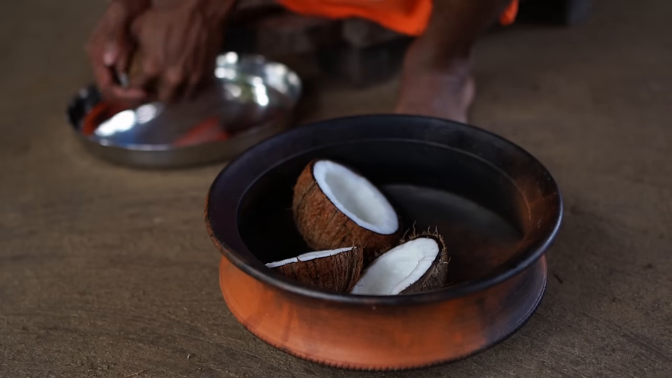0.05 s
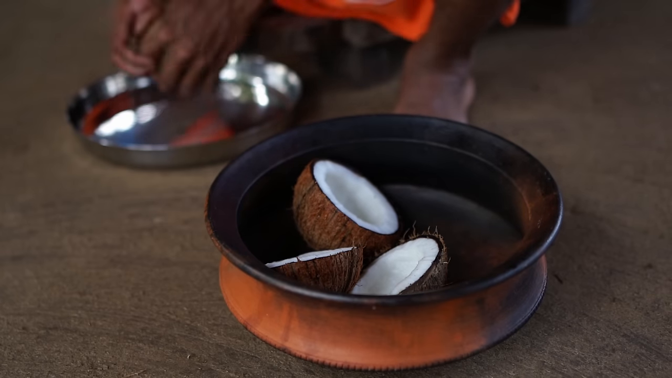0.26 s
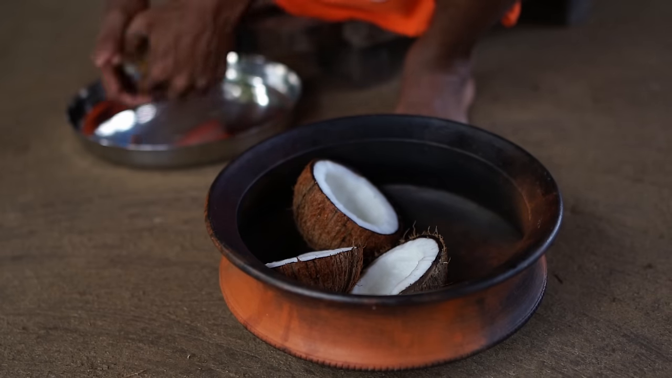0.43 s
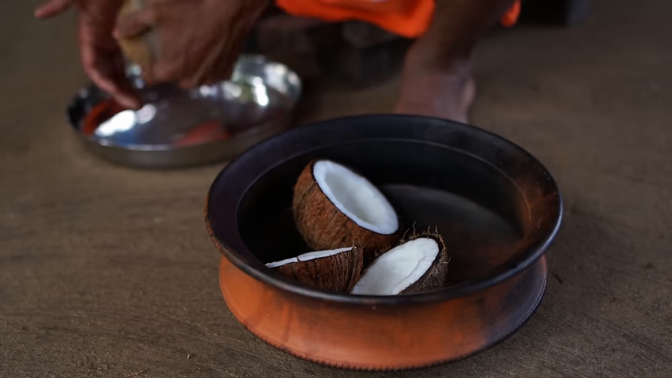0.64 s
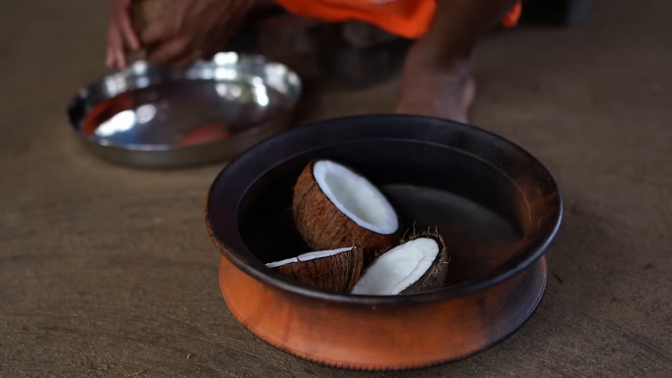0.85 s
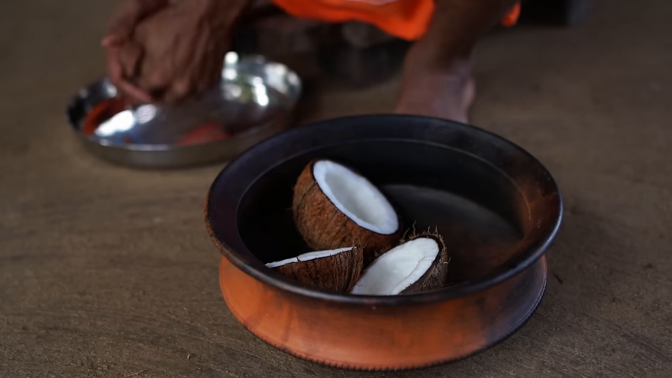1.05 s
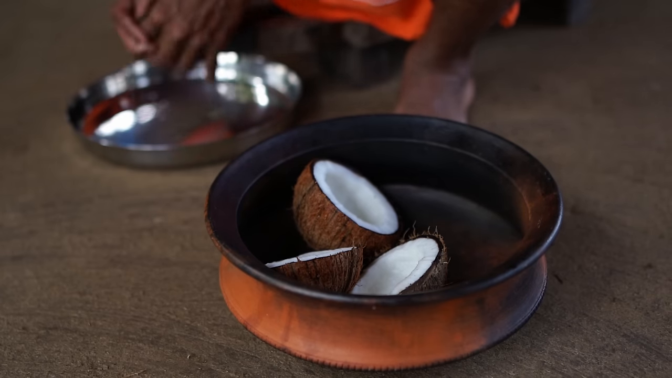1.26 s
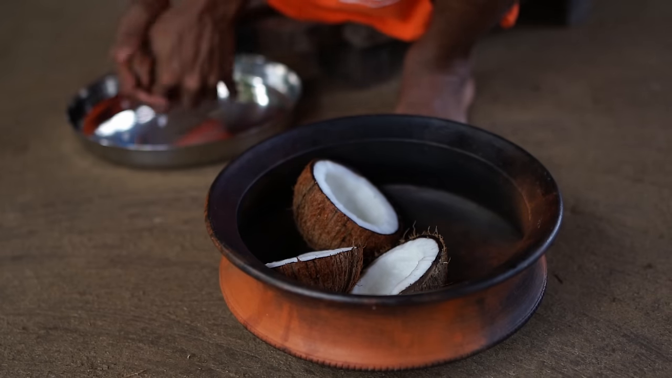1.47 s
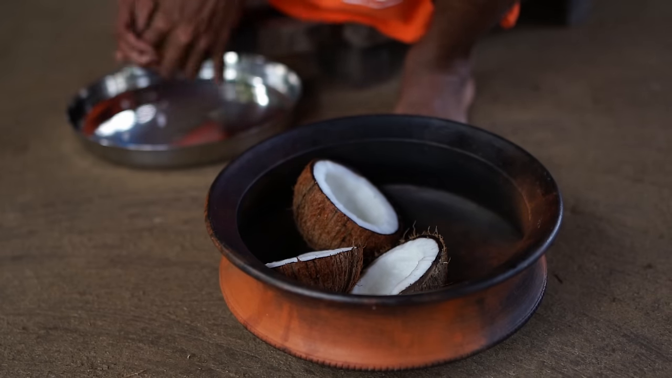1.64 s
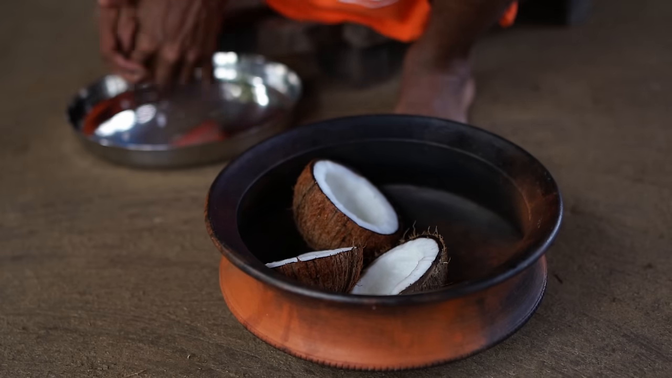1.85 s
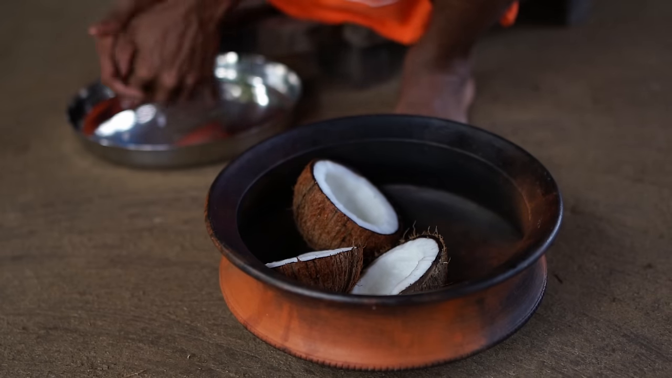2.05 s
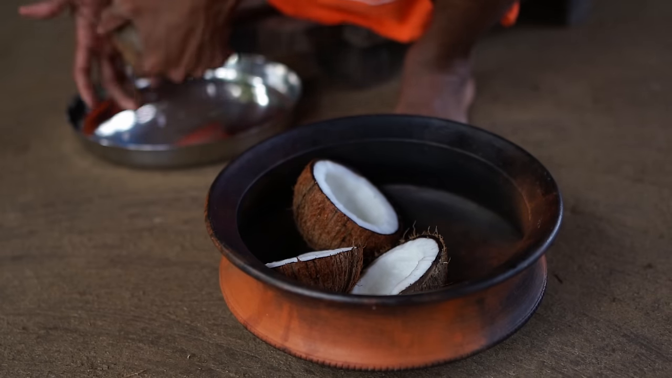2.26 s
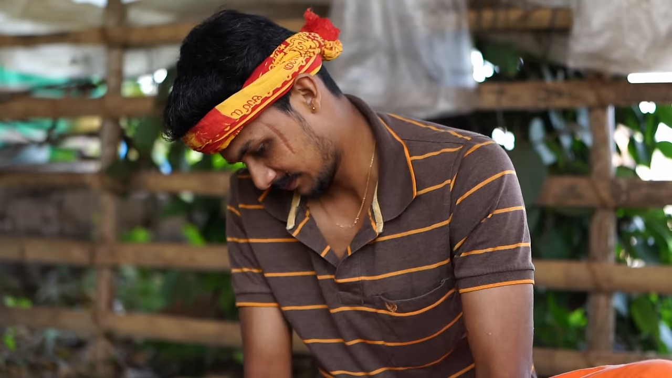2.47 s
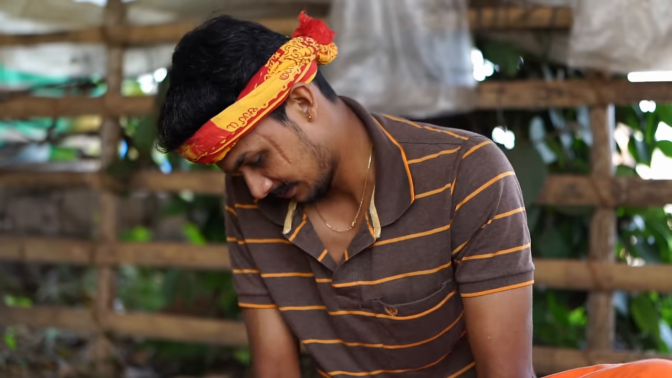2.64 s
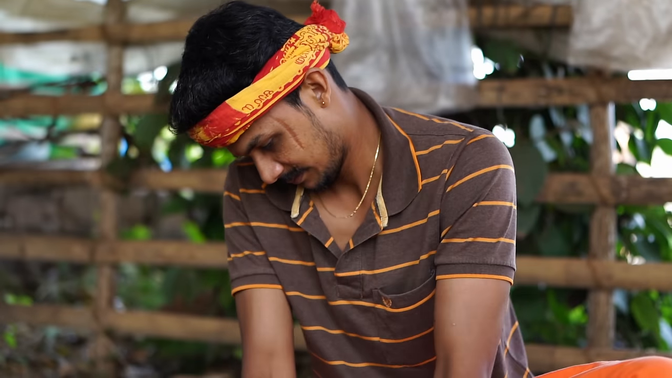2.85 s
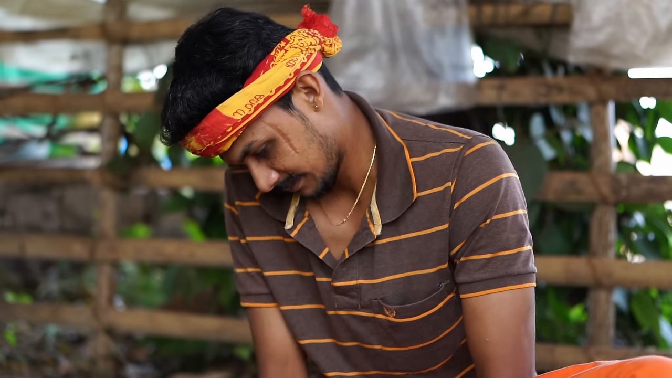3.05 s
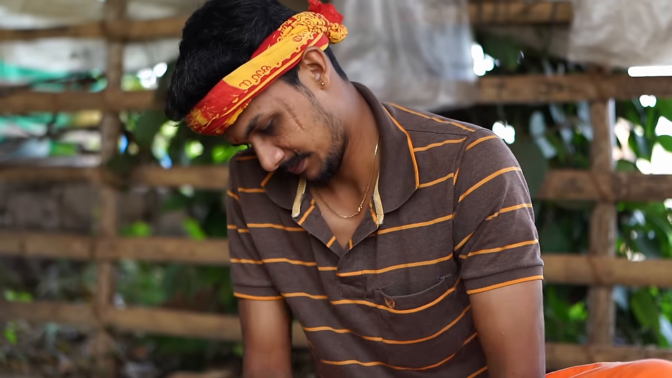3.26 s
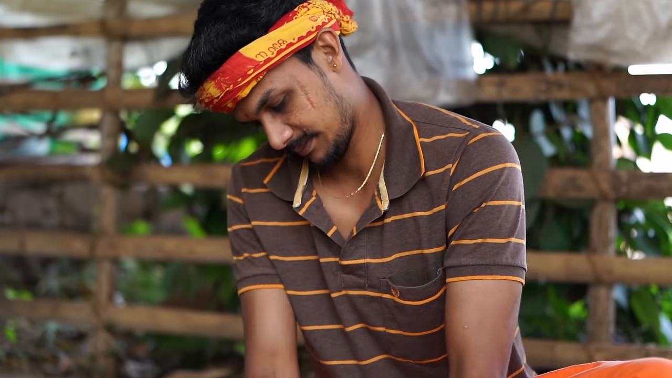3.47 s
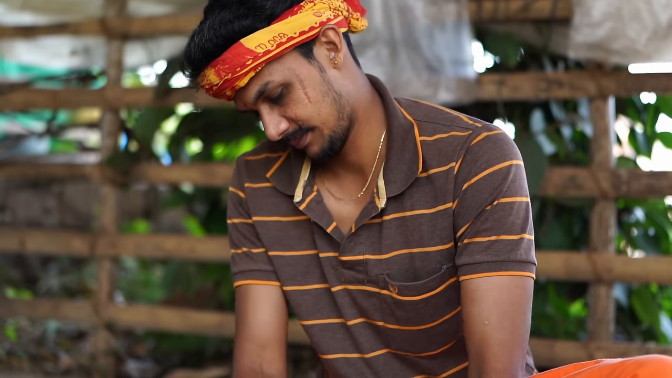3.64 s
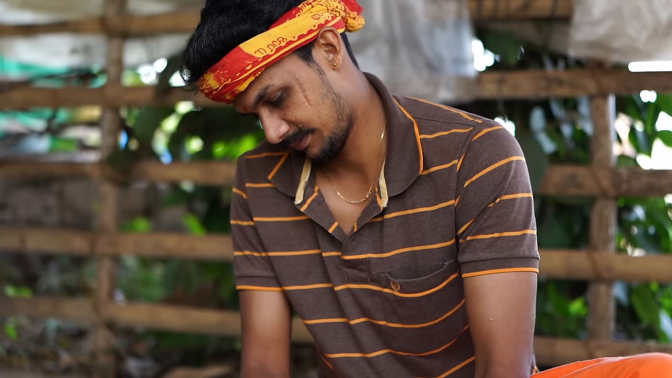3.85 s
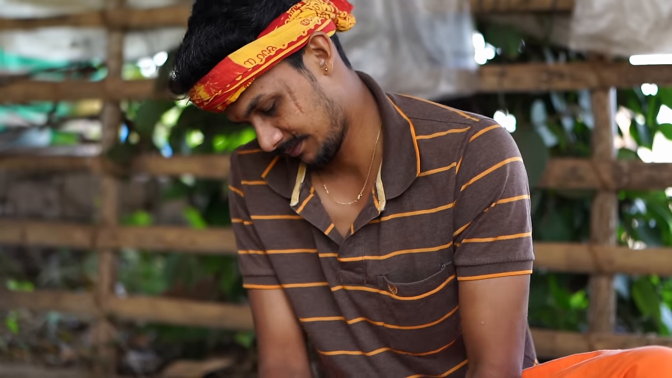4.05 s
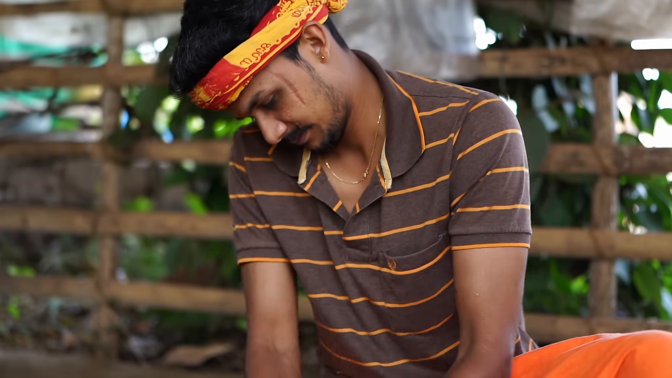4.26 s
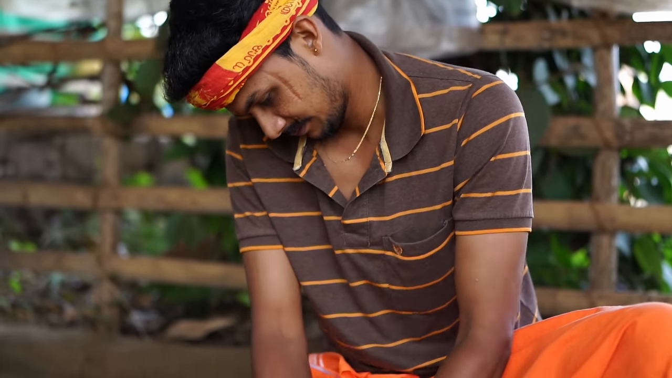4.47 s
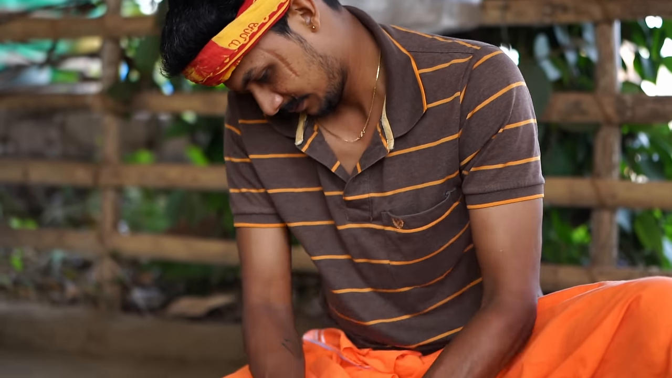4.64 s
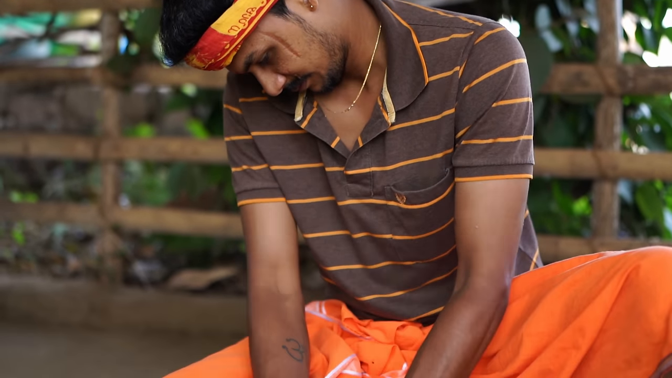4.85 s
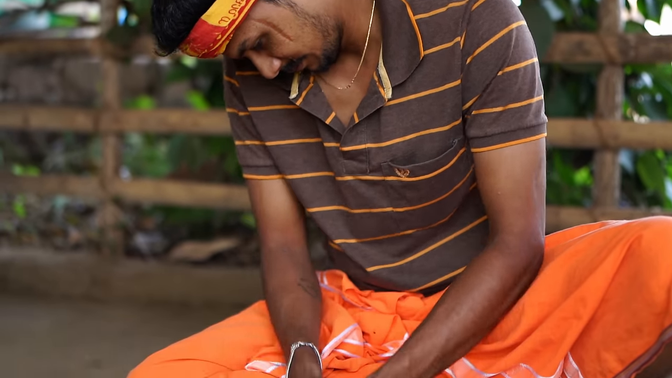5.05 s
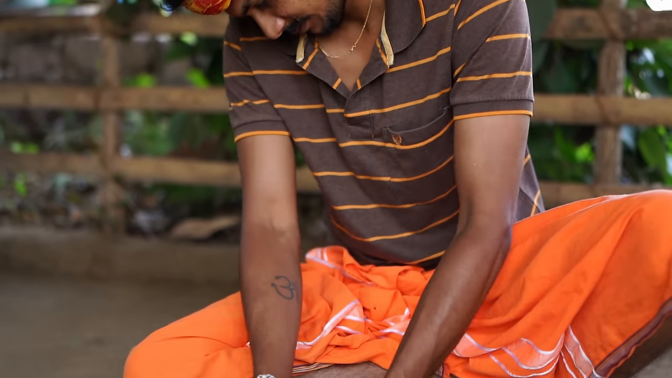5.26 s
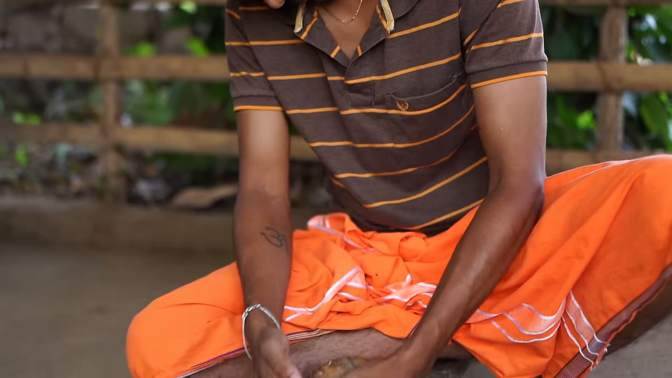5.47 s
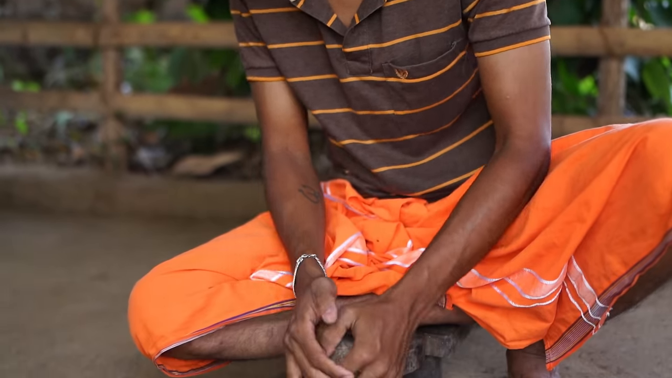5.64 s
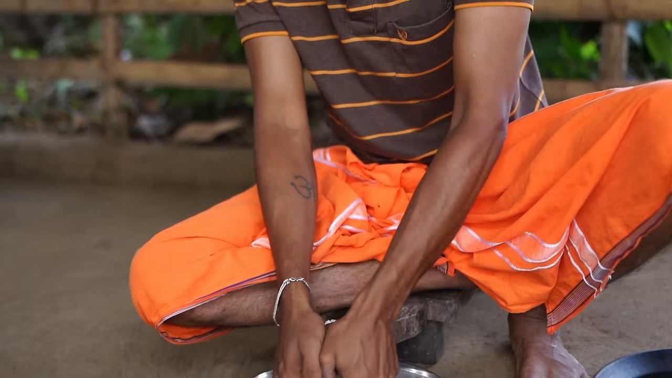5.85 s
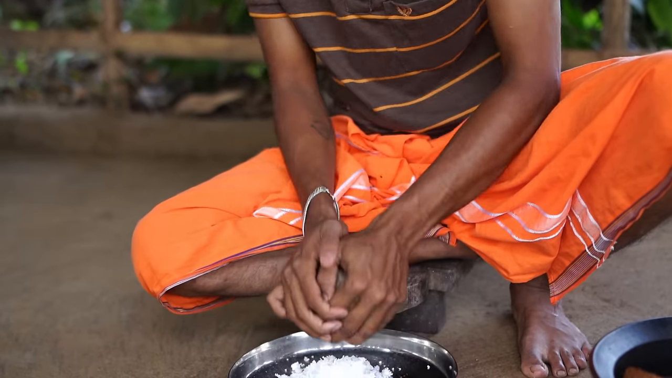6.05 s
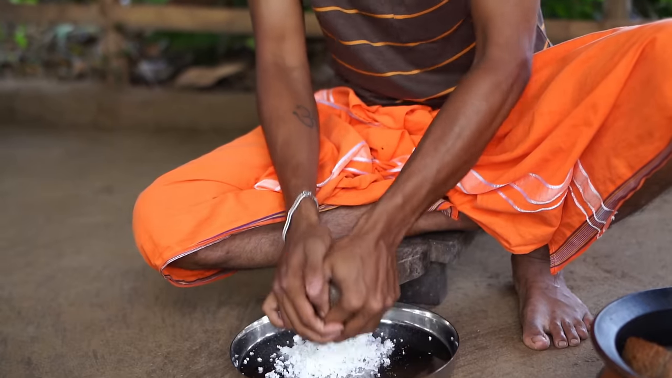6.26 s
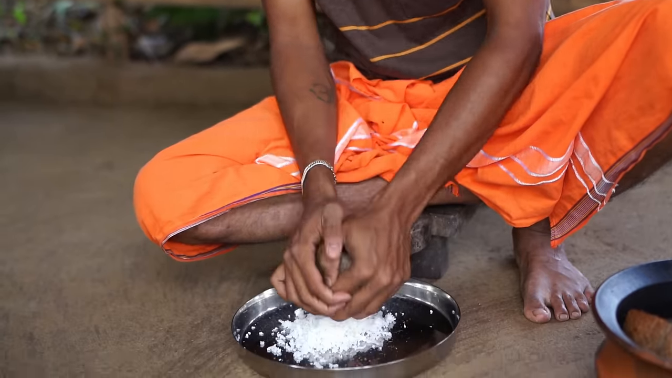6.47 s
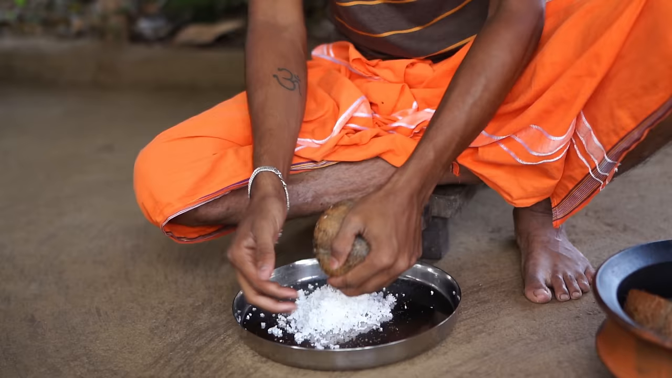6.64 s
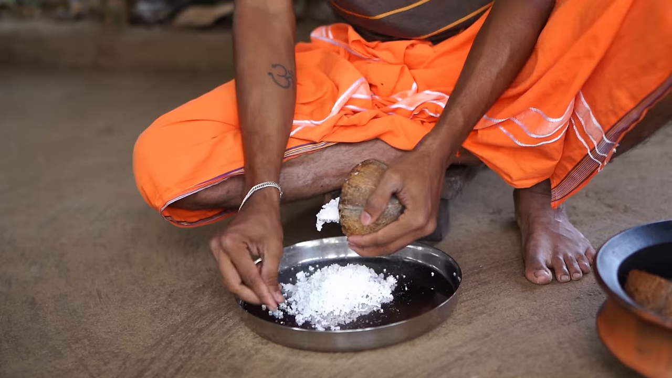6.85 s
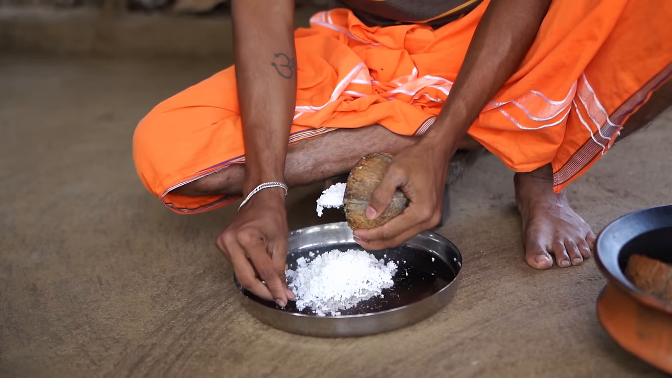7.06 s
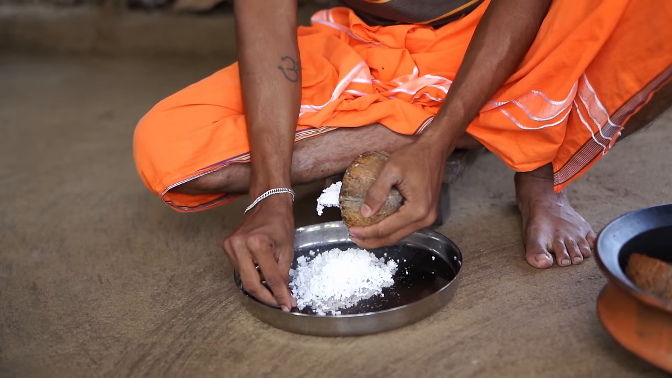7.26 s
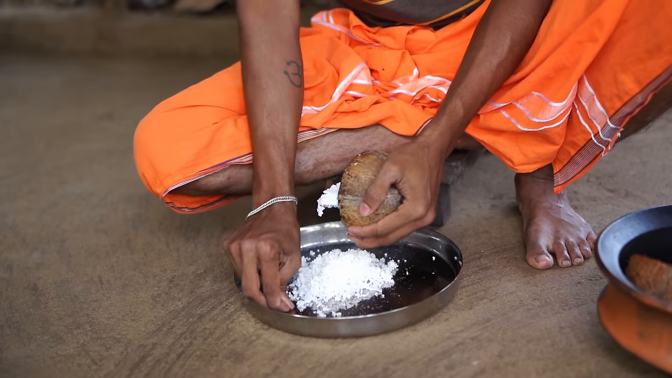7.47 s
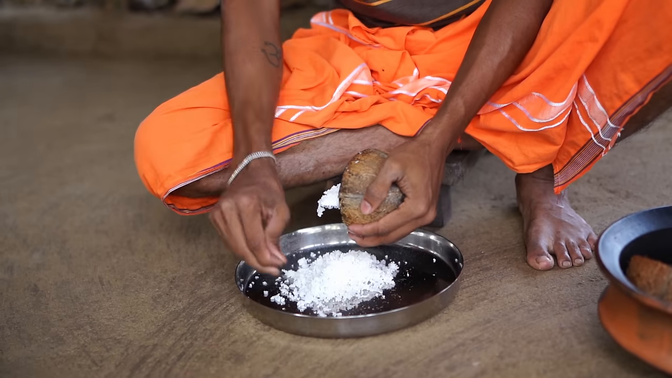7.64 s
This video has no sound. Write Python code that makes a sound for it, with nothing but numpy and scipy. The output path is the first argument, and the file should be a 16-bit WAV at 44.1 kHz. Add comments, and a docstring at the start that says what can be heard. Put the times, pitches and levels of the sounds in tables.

```python
"""Half a coconut is scraped on a serrated steel grater under an open shelter, in uneven bursts of strokes.
From the start the shell knocks on the blade and the teeth stick and slip, ring the shell and tear its fibres.
Between strokes the husk rustles and crumbs tick; at 2.4 s the shell is turned and its resonances change.
Gliding whistles of small birds call early and, faintly, after the last stroke, when soft bumps also sound.
Filtered noise makes the garden air and the draught that grows from about 2.3 s; sines make a faint hum."""
import sys
import numpy as np
from scipy import signal
from scipy.fft import rfft, irfft
from scipy.io import wavfile
from scipy.ndimage import map_coordinates

SR = 44100
rng = np.random.default_rng(int(sys.argv[2]) if len(sys.argv) > 2 else 0)


def int16_out(signal):
    """Quantize to a 16-bit WAV file."""
    q = np.round(np.clip(np.atleast_2d(signal).T, -1, 1) * 32767)
    wavfile.write(sys.argv[1], SR, q.astype(np.int16))


N = 340011
TIME = np.arange(N) / SR
HAND_TIME = TIME[::32]  # coarse time grid for hand movements
FREQS = np.fft.rfftfreq(8192, 1 / SR)
TURN_S = 2.4  # the shell is raised and turned

# shell meets blade, or a tooth catches and lets go:
# start_s, relative_peak_db, crack_re_knock_db (before the mix gains)
KNOCK_EVENTS = [(0.203, -37, 16.5), (0.32, -2, -13), (0.35, -3.5, -16), (0.609, -31, 6),
                (1.005, -2.5, -0.5), (1.036, 0, 2), (1.055, -2.5, 4.5), (1.112, -5, -14),
                (1.277, -41.5, 21.5), (1.316, -19.5, 2), (1.731, -21, -13), (1.763, 2.5, -8.5),
                (1.775, -4, -19), (1.968, -22, -11), (2.59, -33, 6.5), (2.984, -38.5, 17),
                (3.065, -4.5, -6), (3.317, -10, -8), (3.381, 0, -32), (3.875, -23.5, 1), (4.109, -2, -26),
                (4.365, -20, 3.5), (4.721, -25.5, -4), (5.07, -27.5, 11), (5.105, 1.5, -13),
                (5.771, 0, -12), (6.047, -26.5, 10.5), (6.114, 2, -15), (6.12, -2, 4.5),
                (6.383, -19.5, 5.5)]


def amp(db):
    """Decibels to amplitude gain."""
    return 10 ** (np.asarray(db) / 20)


def unit(x):
    """Scales to rms 1."""
    return x / np.sqrt(np.mean(x ** 2) + 1e-20)


def read(points, hz):
    """Interpolates a (hz, db) spectrum on a log-frequency axis."""
    f, db = np.transpose(points)
    return np.interp(np.log(hz + 1), np.log(f + 1), db)


def add(mix, start_s, sound):
    """Mixes a sound in at its start time, in place."""
    part = mix[max(round(start_s * SR), 0):][:len(sound)]
    part += sound[:len(part)]


def follow(curve):
    """Gain over time from a curve of (time_s, level_db)."""
    return amp(np.interp(TIME, *np.transpose(curve)))


def response(db):
    """Minimum-phase impulse response of energy 1 with the given dB spectrum."""
    log_gain = np.log(amp(np.maximum(db, -100)))
    circle = np.r_[log_gain, log_gain[-2:0:-1]]
    spectrum = np.exp(np.conj(signal.hilbert(circle)))[:len(db)]
    taps = irfft(spectrum)[:len(db)]
    return taps / np.linalg.norm(taps)


def ring(x, taps):
    """Plays x through an impulse response."""
    return signal.oaconvolve(x, taps)[:len(x)]


def noise(points):
    """Steady noise of rms 1 with the given spectrum."""
    gain = amp(read(points, np.fft.rfftfreq(N, 1 / SR)))
    return unit(irfft(rfft(rng.standard_normal(N)) * gain, N))


def wander(window_s):
    """Smooth random curve of rms 1."""
    return unit(ring(rng.standard_normal(N), signal.windows.hann(int(window_s * SR) + 3)))


def steadied(x, window_s):
    """Keeps local power near 1: the hand presses evenly."""
    window = signal.windows.hann(int(window_s * SR) + 3)
    power = abs(signal.oaconvolve(x ** 2, window / window.sum(), "same"))
    return x / np.sqrt(power + 1e-4)


def crackle(per_s, spread_db):
    """Random clicks of either sign and uneven size."""
    clicks = (rng.random(N) < per_s / SR) * rng.choice([-1., 1.], N)
    return clicks * amp(spread_db * np.clip(rng.standard_normal(N), -2, 2))


def scrape(bite_db=-2, rasp_db=-5.0, tear_db=2.0, fizz_db=-11, push_db=0):
    """Each slip jolts the shell and the board and snaps a clump of fibres: coarse, fine and finest."""
    # force spectra: hz, db
    bite_tilt = [(200, -3.5), (330, -3.5), (480, -4.5), (800, 0), (1400, -4), (2200, -5.5),
                 (3500, -5.5), (6000, -15), (15000, -56)]
    rasp_tilt = [(400, -11.5), (1000, -17.0), (1400, -5.5), (2400, 0.0), (4000, -14.0), (9000, -26)]
    tear_tilt = [(300, -17), (1200, -10.0), (2200, -9), (3500, -4), (5500, -3.5), (15000, 0)]
    fizz_tilt = [(1000, -75), (4000, -3.5), (7000, -4.0), (15000, -10)]
    slips = slip_train()
    force, tearing, weight = pressure()
    bite = shell(slips * force * catching(), bite_tilt)
    # the heavy board answers evenly, however the slips fall
    push = steadied(board(slips), 0.057) * weight
    rasp = shell(fibres(slips) * tearing, rasp_tilt)
    tear = shell(fibres(slips) * tearing, tear_tilt)
    fizz = shell(fibres(slips) * tearing, fizz_tilt)
    mix = amp(bite_db) * bite + amp(push_db) * push
    mix += amp(rasp_db) * rasp + amp(tear_db) * tear + amp(fizz_db) * fizz
    return turning(mix)


def slip_train(slips_per_s=700, spread_db=5, jitter=.75, recoil=.4):
    """Teeth stick and slip at uneven gaps; most jolts go with the stroke, some spring back."""
    gaps_s = np.exp(jitter * rng.standard_normal(N // 30)) / slips_per_s  # slips_per_s: 1 / median gap
    at = (np.cumsum(gaps_s) * SR).astype(int)
    slips = np.zeros(N)
    slips[at[at < N]] = 1
    sign = np.where(rng.random(N) < recoil, -1, 1)
    slips *= sign * amp(spread_db * np.clip(rng.standard_normal(N), -2, 2))
    return steadied(unit(slips), 0.02)


def swell(s, attack_s, hold_s, release_s, swell_db=30, shoulder=1.66):
    """Level in dB of one hand movement: builds up to time s, holds, lets go along a rounded shoulder."""
    before = np.maximum((s - HAND_TIME) / attack_s, 0)
    after = np.maximum((HAND_TIME - s - hold_s) / release_s, 0)
    return -swell_db * np.minimum(before + after, 4) ** shoulder


def pressure(tear_attack_ratio=1.38, tear_release_ratio=1.226,
             push_lead_s=.004, push_sag_db_per_s=115, push_release_ratio=1.9):
    """Gains of bite, tearing and push: one movement drives all three."""
    # strokes, relative levels before the mix gains:
    # full_pressure_s, attack_s, hold_s, release_s, bite_db, tear_db, push_db
    stroke_table = [(-.01, .05, 0.017, 0.069, -17, -26, -27.5),
                    (0.294, .074, 0.015, .104, -11, -25.5, -17.5),
                    (0.955, 0.049, 0.0027, 0.06, -19, -31, -28.5),
                    (1.013, 0.035, 0.035, 0.12, -14, -29.5, -22.5),
                    (1.348, 0.038, 0.044, 0.097, -11.5, -27, -19.5),
                    (1.519, 0.028, .003, 0.053, -29.5, -48, -41),
                    (1.685, 0.052, 0.045, 0.11, -12.5, -26, -23.5),
                    (2.012, 0.049, 0.044, 0.088, -11.5, -25, -23),
                    (2.706, 0.04, 0.079, .102, -15, -28, -28),
                    (3.089, 0.079, 0.023, .108, -11.5, -25.5, -28),
                    (3.385, 0.052, 0.047, 0.11, -13, -27.5, -28),
                    (3.905, 0.017, 0.0098, 0.12, -37.5, -51, -43),
                    (4.09, 0.037, 0.087, 0.071, -11, -30, -35),
                    (4.463, 0.072, 0.045, 0.082, -13.5, -27, -30.5),
                    (4.788, 0.057, 0.045, 0.09, -14, -26, -25.5),
                    (5.113, 0.035, 0.05, 0.11, -14, -26.5, -23.5),
                    (5.757, .034, 0.071, 0.089, -16.5, -27, -38.5),
                    (6.098, 0.031, 0.055, 0.1, -14.5, -26.5, -24.5),
                    (6.441, 0.034, 0.065, 0.088, -16, -27.5, -26.5)]
    bite, tearing, push = np.zeros((3, len(HAND_TIME)))
    for s, attack_s, hold_s, release_s, bite_db, tear_db, push_db in stroke_table:
        bite += amp(bite_db + swell(s, attack_s, hold_s, release_s))
        # tearing starts before the bite and outlasts it
        tear_swell_db = swell(s, attack_s * tear_attack_ratio, hold_s, release_s * tear_release_ratio)
        tearing += amp(tear_db + tear_swell_db)
        # the board takes the weight as the stroke lands, then is eased
        sag_db = push_sag_db_per_s * np.maximum(HAND_TIME - s, 0)
        push_swell_db = swell(s - push_lead_s, attack_s, hold_s, release_s * push_release_ratio)
        push += amp(push_db - sag_db + push_swell_db)
    return [np.interp(TIME, HAND_TIME, gain) for gain in (bite, tearing, push)]


def catching(hold_s=0.005, hold_db=-7):
    """A caught tooth damps the bite until the knock that frees it."""
    stuck, n = np.zeros(N), int(hold_s * SR)
    for s, _, _ in KNOCK_EVENTS:
        add(stuck, s - hold_s + 0.00053, signal.windows.tukey(n, .5))
    return amp(hold_db * np.minimum(stuck, 1))


def fibres(slips, snap_s=0.005, clump=.55, patchy_db=2, grain_db=2):
    """Fine crackle swells around each slip, in small clumps and broader patches as the flesh varies."""
    window = signal.windows.hann(int(snap_s * SR) + 3)
    slip_power = signal.oaconvolve(slips ** 2, window / window.sum(), "same")
    snapping = np.sqrt(abs(1 - clump + clump * slip_power))
    uneven = unit(amp(patchy_db * wander(0.037) + grain_db * wander(0.0031)))
    return steadied(unit(crackle(per_s=10000, spread_db=2)), 0.0063) * snapping * uneven


def shell(drive, tilt):
    """Rings the hollow shell and the blade; tilt is the spectrum of the force."""
    # body spectra, held low over the plate / raised and turned: hz, level_db
    low_colour = [(40, -55), (90, -39), (140, -24.9), (220, -11.8), (400, -5.4), (850, 0.0), (1200, -5.8),
                  (1450, -19.3), (2000, -8.4), (2500, -13.2), (4300, -17.5), (6000, -25.7), (9000, -30.1),
                  (15500, -40.2)]
    turned_colour = [(40, -55), (90, -34), (140, -20.2), (220, -10.8), (400, -10.0), (850, 0.0),
                     (1200, -7.7), (1450, -17.9), (2000, -18.2), (2500, -18.5), (4300, -17.1),
                     (6000, -25.9), (9000, -29.6), (15500, -40.6)]
    # shell resonances in the same positions: centre_hz, width_hz, lift_db
    low_modes = [(257, 69, 12.5), (309, 30, 5.0), (490, 85, 4.3), (788, 30, 4.1), (895, 35, 4.4),
                 (970, 47, 7.4), (1250, 126, 10.0), (1501, 128, 12.5), (2099, 60, 6.1), (2240, 130, 5.0),
                 (2757, 186, 4.1), (3594, 210, 1.9), (4439, 116, 3.3), (5459, 428, 5.4), (13338, 549, 7.8)]
    turned_modes = [(242, 67, 5.0), (371, 76, 10.4), (479, 83, 8.8), (634, 30, 4.2), (710, 85, 4.4),
                    (776, 68, 1.6), (957, 30, 3.9), (1287, 137, 2.3), (1828, 179, 4.3), (2268, 107, 4.6),
                    (2952, 64, 2.6), (3217, 189, 3.8), (3620, 75, 4.0), (4598, 228, 4.3), (13207, 703, 5.5)]
    rung = []
    for colour, modes in (low_colour, low_modes), (turned_colour, turned_modes):
        lifts_db = sum(db / (1 + (2 * (FREQS - hz) / width) ** 2) for hz, width, db in modes)
        rung.append(ring(drive, response(read(colour, FREQS) + lifts_db + read(tilt, FREQS))))
    return np.where(TIME < TURN_S, *rung)


def board(drive, lowering=1.17):
    """The board thuds; its pitch drops once the shell is turned and more weight rests on it."""
    # wooden board response before the pitch drop: hz, level_db
    board_spectrum = [(60, -34), (135, -24), (195, -11), (245, 0), (290, -1), (350, -13), (600, -40),
                      (2000, -75)]
    light = ring(drive, response(read(board_spectrum, FREQS)))
    loaded = ring(drive, response(read(board_spectrum, FREQS * lowering)))
    return np.where(TIME < TURN_S, light, loaded)


def turning(x, drift_s=.001):
    """The shell turns in the hands: a wandering delay drifts its resonances by about 2 percent."""
    drift = drift_s * SR * wander(.17)
    return map_coordinates(x, [np.arange(N) + drift], order=3)


def knocks(knock_db=11.5, crack_db=9, crack_s=0.0042, crush_s=0.0023, touch=0.33):
    """A light touch, then a hard blow on the shell; the flesh is crushed around it in a short burst."""
    blow_tilt = [(150, 3.5), (500, 2), (1400, 2.0), (4000, -12.5), (15000, -48)]  # hz, db
    crack_tilt = [(300, 0.5), (1400, -3.5), (4000, 4.0), (9000, 8)]
    blows, cracks, t = np.zeros(N), np.zeros(N), TIME[:SR // 40]
    for s, db, sharp_db in KNOCK_EVENTS:
        burst = rng.standard_normal(len(t)) * t ** 2 * np.exp(-3 * t / crack_s)
        crush = rng.standard_normal(len(t)) * t * np.exp(-2 * t / crush_s)
        add(blows, s, touch * amp([db]))
        add(blows, s + 0.00225, amp([db]))
        crack = unit(unit(burst) + 0.41 * unit(crush)) / np.sqrt(len(t))  # energy 1
        add(cracks, s, amp(db + sharp_db) * crack)
    return amp(knock_db) * shell(blows, blow_tilt) + amp(crack_db) * shell(cracks, crack_tilt)


def husk(rustle_db=-2, tick_db=12, tick_s=0.0081):
    """Dry fibres crackle under the fingers; crumbs and fibres tick as decaying noise bursts."""
    # ticks: start_s, relative_peak_db (before tick_db)
    tick_table = [(0.473, -30), (0.5205, -38), (0.663, -32), (0.677, -31), (0.7492, -30), (0.832, -28),
                  (2.179, -26), (2.2317, -29), (2.303, -46), (2.5103, -32), (2.5548, -33), (3.839, -37),
                  (4.685, -32), (5.3457, -28), (5.44, -29.5), (5.4866, -37), (5.5442, -26.5), (7.206, -37)]
    # husk and tick spectrum: hz, level_db
    husk_spectrum = [(300, 6), (1200, 6), (4000, 3), (8000, -1.5), (13500, -5), (16000, 3.5)]
    grains = steadied(unit(crackle(per_s=900, spread_db=7)), .12)
    drive = amp(rustle_db) * grains * grip()
    t = TIME[:SR // 40]
    for s, db in tick_table:
        burst = rng.standard_normal(len(t)) * np.exp(-t / tick_s)
        add(drive, s + 0.0004, amp(db + tick_db) * burst / np.linalg.norm(burst))
    return ring(drive, response(read(husk_spectrum, FREQS)))


def grip():
    """Gain of the rustle as the fingers take a new hold."""
    # hand shifts on the husk: firmest_s, attack_s, release_s, relative_level_db
    grip_table = [(.45, 0.065, 0.28, -52), (.835, 0.041, 0.083, -40), (1.22, 0.057, 0.27, -53.5),
                  (2.2, 0.08, 0.46, -51), (2.42, 0.18, 0.068, -57), (2.65, 0.12, 0.031, -43.5),
                  (3.62, 0.17, 0.33, -54), (3.93, 0.19, 0.35, -45.5), (5.36, .15, 0.2, -48.5),
                  (5.493, .015, 0.11, -47), (5.68, 0.23, 0.066, -43), (6.81, 0.13, 0.085, -56)]
    gain = sum(amp(db + swell(s, attack_s, 0, release_s)) for s, attack_s, release_s, db in grip_table)
    return np.interp(TIME, HAND_TIME, gain)


def bumps(length_s=0.066):
    """Dull low sine pulses as the weight shifts on the board."""
    # bumps: start_s, pitch_hz, peak_db
    bump_table = [(6.35, 71, -32.5), (6.74, 83, -36.5), (7.329, 67.6, -44)]
    out, t = np.zeros(N), TIME[:int(length_s * SR)]
    for s, hz, db in bump_table:
        add(out, s, amp(db) * np.sin(2 * np.pi * hz * t) * signal.windows.hann(len(t)))
    return out


def birds(rasp_s=0.0029, flutter_db=3.5, flutter_s=0.024):
    """Gliding whistles that flutter in level, roughened by a quick scatter of pitch."""
    # notes: start_s, length_s, first_hz, last_hz, relative_level_db, pitch_scatter_hz
    note_table = [(0.086, 0.047, 2930, 2750, -37.5, 28), (0.445, 0.073, 3130, 3400, -41, 170),
                  (0.47, 0.099, 3880, 4220, -55, 87), (0.591, 0.11, 2750, 2830, -41, 130),
                  (.615, 0.11, 3162, 3170, -30, 35), (1.485, 0.14, 3300, 3500, -46.5, 220),
                  (3.615, 0.24, 690, 666, -52.5, 12), (5.006, 0.023, 1830, 1750, -43, 160),
                  (6.685, 0.059, 4000, 4000, -60, 30), (6.711, 0.071, 1145, 1127, -52, 18),
                  (6.812, 0.08, 3130, 3700, -58, 110), (6.968, 0.091, 3660, 3320, -57, 200),
                  (7.065, 0.059, 3770, 3950, -52, 130), (7.197, 0.064, 2490, 3330, -50, 430),
                  (7.219, 0.093, 3660, 3790, -50.5, 170), (7.298, 0.046, 3200, 2950, -54, 160),
                  (7.359, 0.075, 3920, 3520, -51.5, 140), (7.383, 0.067, 3330, 3230, -57, 30),
                  (7.484, 0.087, 3670, 3540, -51.5, 115), (7.557, 0.078, 2880, 3070, -52.5, 210)]
    out, scatter = np.zeros(N), wander(rasp_s)
    flutter = amp(flutter_db * wander(flutter_s))
    for s, length_s, first_hz, last_hz, db, rasp_hz in note_table:
        note = np.arange(int(s * SR), int((s + length_s) * SR)) % N
        hz = np.linspace(first_hz, last_hz, len(note)) + rasp_hz * scatter[note]
        whistle = np.sin(2 * np.pi * np.cumsum(hz) / SR)
        fade = signal.windows.tukey(len(note), .5)
        add(out, s, amp(db) * unit(whistle * flutter[note] * fade))
    return out


def garden(air_db=-45.5, sway_db=1, waver_hz=1.66):
    """Soft swaying hiss, a faint far-off wavering hum, and a slow draught's deep flutter."""
    # air spectrum: hz, level_db
    air_spectrum = [(25, 3), (50, -11.5), (80, -2), (130, -5.5), (220, -10), (400, -14), (1000, -20),
                    (3600, -25), (6500, -35), (15500, -43)]
    # hum: pitch_hz, peak_db
    hum_table = [(79, -55), (98, -62), (117, -52)]
    # draught level: time_s, level_db
    draught_curve = [(0, -80), (2.25, -61), (2.5, -41), (3.1, -40), (3.28, -31), (3.55, -39.5), (6.0, -40),
                     (6.5, -37), (7.7, -39)]
    flutter_spectrum = [(3, -76), (10, 13.5), (16, 6.0), (26, -28), (42, -8), (200, -100), (1000, -110)]
    air = amp(air_db + sway_db * wander(0.15)) * noise(air_spectrum)
    hum = np.zeros(N)
    for hz, db in hum_table:
        phase = 2 * np.pi * np.cumsum(hz + waver_hz * wander(0.29)) / SR
        hum += amp(db) * np.sin(phase)
    return air + hum + follow(draught_curve) * noise(flutter_spectrum)


def echoes(x, t60_s, delay_s):
    """Scattered reflections that die away by 60 dB in t60_s."""
    t = TIME[:SR // 2]
    taps = crackle(per_s=2000, spread_db=2)[:len(t)] * amp(-60 * t / t60_s) * (t > delay_s)
    return ring(x, taps / np.linalg.norm(taps))


def shifting_echoes(x, t60_s, delay_s, turn_s=.09):
    """Hands and shell keep moving, so three patterns of reflections crossfade in rotation."""
    angle = np.pi * TIME / turn_s
    out = np.zeros(N)
    for k in range(3):
        out += np.cos(angle + k * np.pi / 3) ** 2 * echoes(x, t60_s, delay_s)
    return out / np.sqrt(9 / 8)  # keeps the summed power at 1


def scene():
    """The grater is close; the birds are far off among the trees."""
    work = scrape() + knocks() + husk()
    calls = birds()
    near = amp(-3.0) * shifting_echoes(work, t60_s=0.022, delay_s=.001)
    shelter = amp(-14) * shifting_echoes(work, t60_s=0.21, delay_s=0.0041)
    trees = amp(-10) * echoes(calls, t60_s=.6, delay_s=.02)
    return (work + near + shelter + amp(-3.5) * calls + trees + bumps() + garden())[None]


def record(dry, ceiling=0.89, edge_hz=15800):
    """Rounds off the tallest peaks, then low-passes at edge_hz."""
    rounded = dry / (1 + (dry / ceiling) ** 6) ** (1 / 6)
    lowpass = signal.firwin(511, edge_hz, window=("kaiser", 9), fs=SR)
    return signal.oaconvolve(rounded, lowpass[None], "same")


dry = scene()
out = record(dry)
int16_out(out)
```